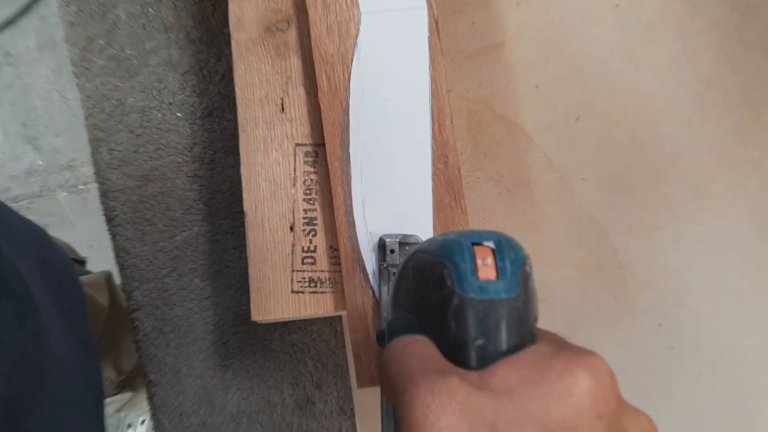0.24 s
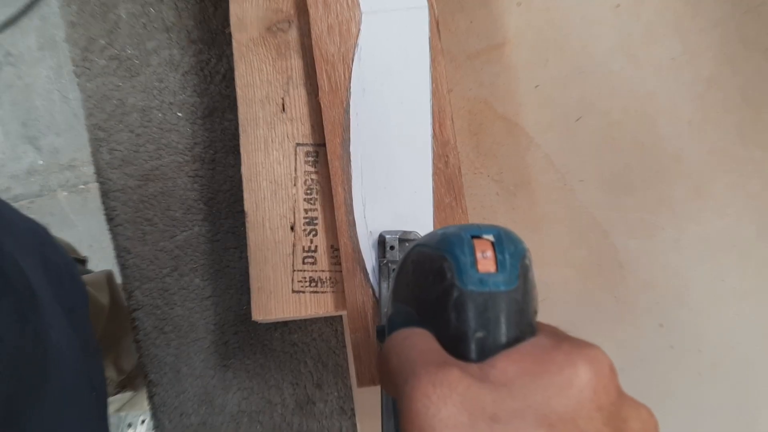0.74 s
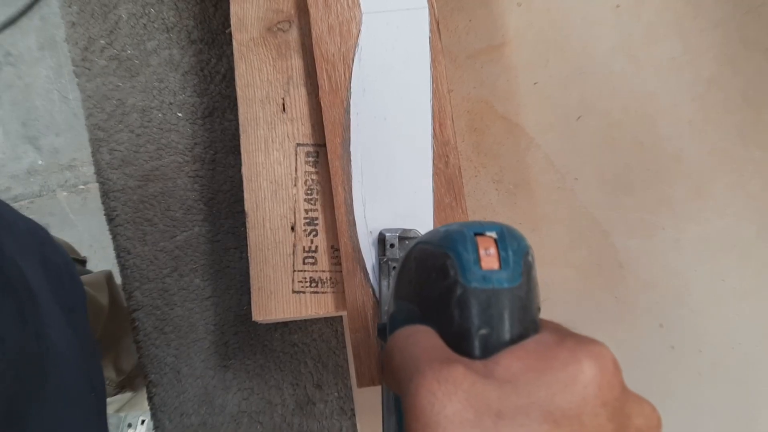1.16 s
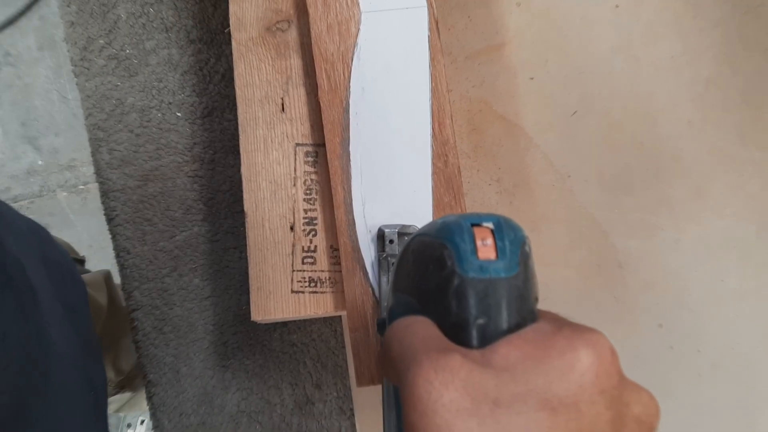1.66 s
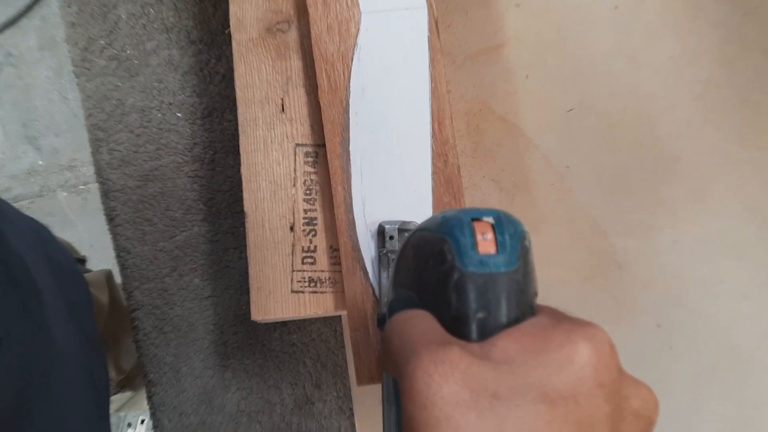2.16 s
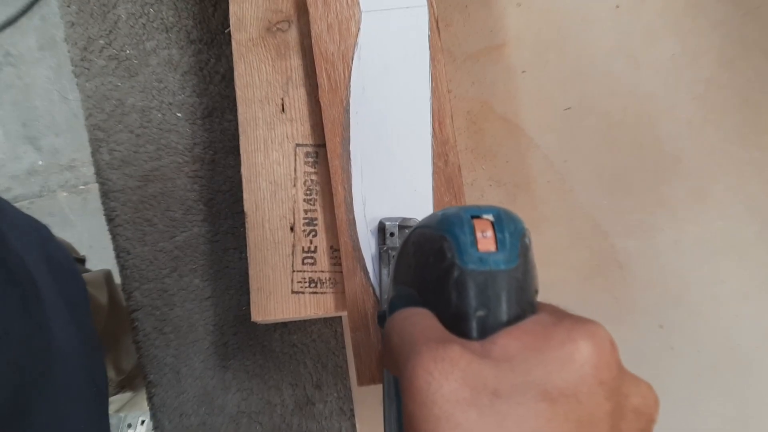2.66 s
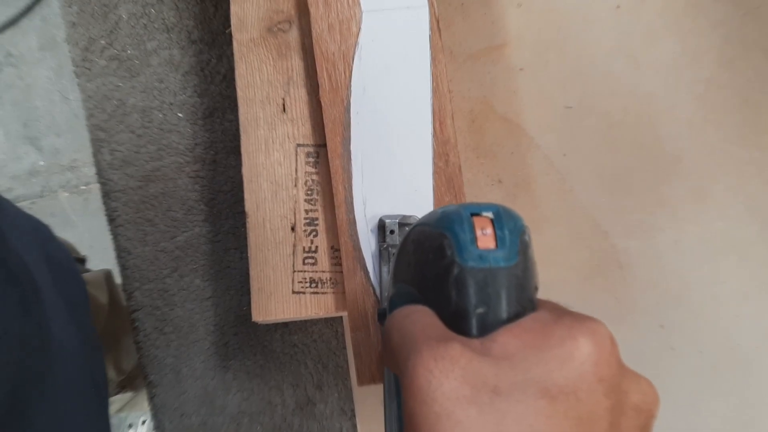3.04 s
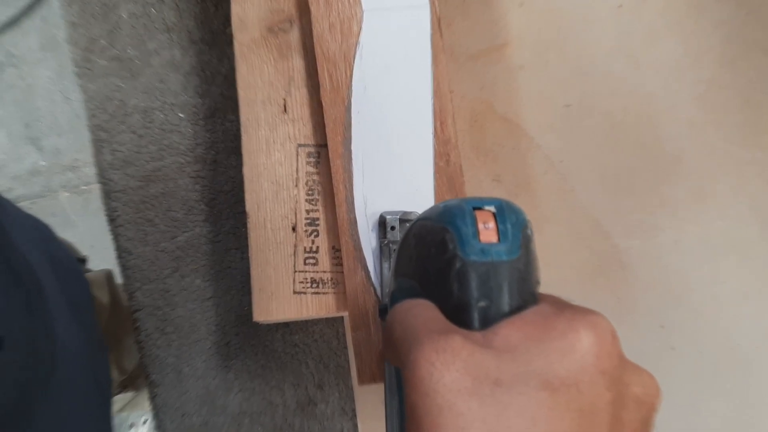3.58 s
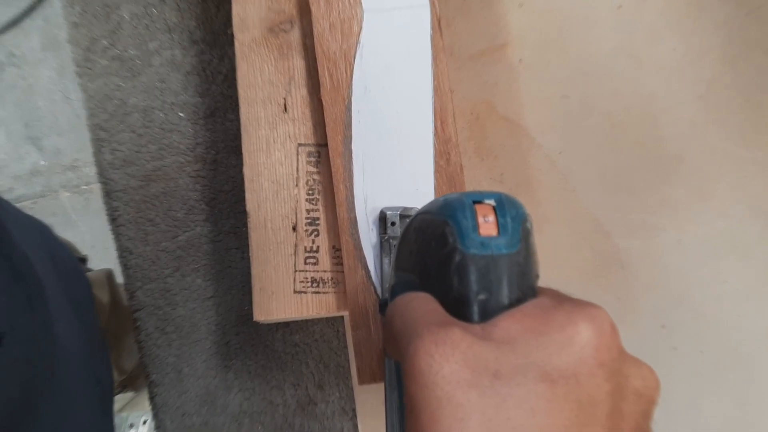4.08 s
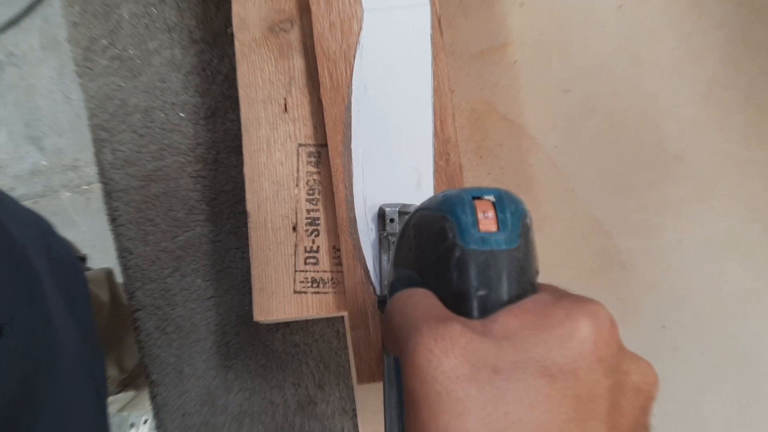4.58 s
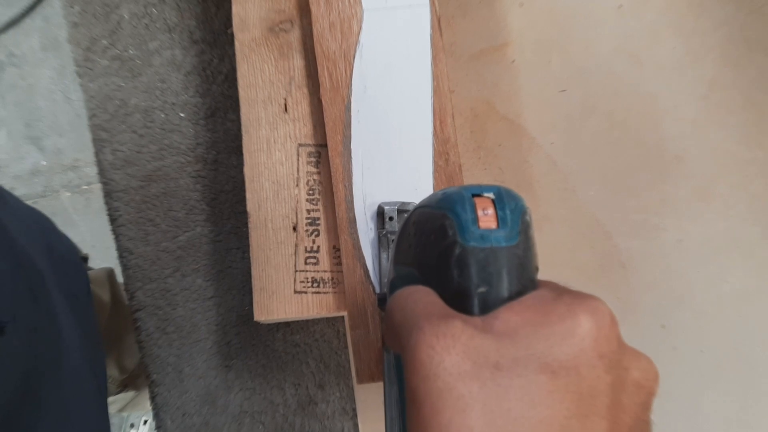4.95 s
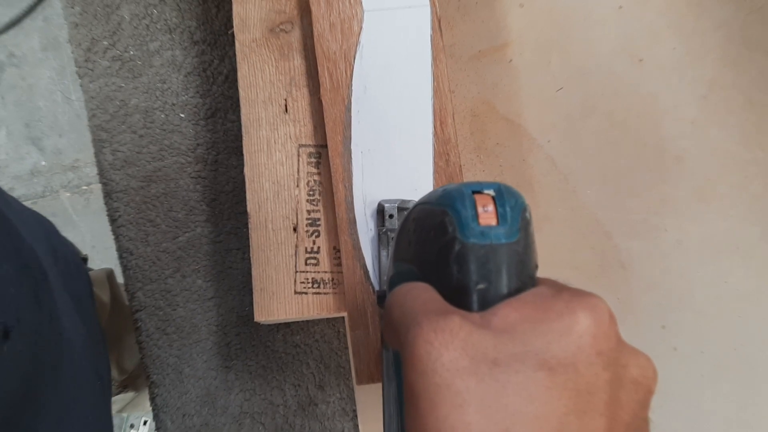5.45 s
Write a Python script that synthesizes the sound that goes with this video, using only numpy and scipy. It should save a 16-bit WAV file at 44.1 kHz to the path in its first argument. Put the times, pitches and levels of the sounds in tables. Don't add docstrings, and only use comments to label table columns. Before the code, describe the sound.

Close, loud power-saw chatter on wood: a rough buzz of about forty-four strokes per second, each with a hard knock and a softer return. Bright casing rattle and tearing fibres dominate over a weak hum. Pitch sags slightly, then recovers near the end, while the tone shifts and a foot-plate ring joins. Dry workshop, stereo microphone near the tool, no ending or stop.

```python
import sys
import numpy as np
from scipy import signal
from scipy.fft import rfft, irfft
from scipy.io import wavfile
from scipy.ndimage import uniform_filter1d, minimum_filter1d, map_coordinates

SR = 44100
rng = np.random.default_rng(int(sys.argv[2]) if len(sys.argv) > 2 else 0)


def to_linear_factor(level_db):
    exponent = np.asarray(level_db, float) / 20
    return 10 ** exponent


def master(y):
    cut = np.clip(np.atleast_2d(y).T, -1, 1)
    pcm = np.round(cut * 32767)
    wavfile.write(sys.argv[1], SR, pcm.astype(np.int16))


N = 251811
TIME = np.arange(N) / SR


def rms_one(x):
    return x / np.sqrt(np.mean(x ** 2) + 1e-20)


def in_time(rows):
    s, *columns = np.transpose(rows)
    return [np.interp(TIME, s, c) for c in columns]


def at_hz(points, hz):
    table_hz, values = np.transpose(points)
    return np.interp(np.log(hz + 1), np.log(table_hz), values)


def drift(rate_hz):
    count = int(N / SR * rate_hz) + 3
    return map_coordinates(rng.standard_normal(count), [TIME * rate_hz], order=2)


def grip_thump():
    lower = np.exp(-(TIME / 0.048) ** 2) * np.sin(2 * np.pi * 92 * TIME + 1.5)
    upper = 0.47 * np.exp(-((TIME - .06) / 0.025) ** 2) * np.sin(2 * np.pi * 145 * TIME)
    return to_linear_factor(-37.5) * (lower + upper)


# [t/s, stroke rate f/Hz]
SPEED = [(0, 44.591), (.4, 44.149), (1.5, 44.136), (2.0, 43.714), (2.6, 43.611), (3.1, 43.471),
         (4.5, 43.538), (5.71, 44.684)]


def crank():
    start_turn = .021
    return start_turn + np.cumsum(in_time(SPEED)[0]) / SR


# [multiple of the stroke rate, level/dB]
HUM = [(2, -22), (3, -19), (4, -13), (5, -6.5), (6, 0), (7, -11.5), (8, -14), (10, -6), (11, -22), (12, -5),
       (13, -14), (14, -11), (15, -17), (17, -10), (19, -8)]
# [t/s, strongest point/turn of the three]
THROB = [(.3, 1.2), (1.3, -.8), (2.4, .5), (3.1, 2.2), (4.5, 2.2), (5.0, 1.3)]


def hum(turns):
    swing = 2 * np.pi * (turns - 1 / 3)
    throb = 1 + .45 * np.exp(-2j * np.pi * (turns - in_time(THROB)[0]) / 3)
    ending = np.clip(TIME - 3.4, 0, 1.5)
    growth_db_per_s = {12: 1.0, 13: 4.0}
    total = 0
    for order, db in HUM:
        level_db = -51 + db + growth_db_per_s.get(order, -3.0) * ending + 0.95 * drift(12.0)
        total = total + to_linear_factor(level_db) * np.exp(1j * order * (swing + 0.025 * drift(9.0)))
    return np.real(throb * total)


# [t/s, guide level/dB, holder and casing level/dB]
BITES = [(0.1787, -0.5, 1), (0.2005, 0.5, 0), (0.2689, 1, 0.5), (0.4046, 1, -1), (0.4725, 1, -0.5),
         (0.5182, -0.5, 0.5), (0.7215, 1, 0), (0.8123, -0.5, 2.0), (0.903, 3.0, -1), (1.0161, 1, 1),
         (1.1068, 2, 2), (1.1497, 1, 1), (1.308, 2, 0.5), (1.3559, 2, 2), (1.4913, 2, -2), (1.5824, 1.5, 2),
         (1.785, 1, 0), (1.8074, -2, 1), (1.876, 2.0, 0), (1.924, 1, 0.5), (2.4279, 2.0, -0.5),
         (2.451, 1, -2), (2.4939, 2, -0.5), (2.562, 1, 0), (2.6544, 3, -2.5), (2.7267, 2.0, -1),
         (3.049, -0.5, -2), (3.21, 0, 1.5), (3.4164, 0.5, -0.5), (3.62, 2, 1.5), (3.7578, 3.5, -1),
         (3.8273, -1.5, 0.5), (3.898, 1, 0.5), (3.9188, 2.5, -2.5), (3.9877, 1.5, 1), (4.056, 1.5, 1.0),
         (4.1256, 0.5, 0), (4.1947, 0.5, 0), (4.2667, 0, 0), (4.379, -0.5, 3), (4.4474, 1.5, 0.5),
         (4.4712, 1.5, 0.5), (4.517, 3, 0.5), (4.585, -1.5, 0.5), (4.6547, 1, 1), (4.7034, 3, 1),
         (4.726, -0.5, 0), (4.7907, 2, 1.5), (4.859, 2.0, 0.5), (4.9073, 2, 0.5), (4.928, 2, -0.5),
         (4.9755, 2.5, 2), (5.0869, 3, 0), (5.155, 2.5, -1.5), (5.2706, 1.5, -2), (5.4068, 0.5, -1.5),
         (5.4519, 1.5, -1), (5.4741, 0, -0.5), (5.5156, 1.5, 1.5)]
# [t/s, guide level/dB, holder and casing level/dB]
SKATES = [(0.155, 1, -5), (0.292, 0, 1), (0.314, 0, -1.5), (0.377, -2.0, -2.0), (0.495, -1.5, 0.5),
          (0.54, -0.5, -1), (0.926, -8, 0.5), (0.948, -1.5, -1), (0.972, -3, 0), (0.993, -1.5, -3),
          (1.129, 0, -3), (1.333, -6, -2.5), (1.401, -4, 1.5), (1.424, -2, -4), (1.628, -1, 2.5),
          (1.673, 0, 1), (1.696, 1, 0), (1.764, 0, -2), (1.901, -3.5, -1), (1.947, 0, -1), (1.992, 0, 0),
          (2.176, -4, 0.0), (2.244, 3.5, -1), (2.313, 0, -2), (2.382, -2.0, -2.5), (2.473, -7, -2),
          (2.541, -3, -1.5), (2.611, -6, -1), (2.886, -5, 0.5), (3.072, -1.5, -0.5), (3.094, -1.5, 1),
          (3.232, -1, 1), (3.275, -2.0, 1.5), (3.486, -1, 0.5), (3.532, -2.0, -0.5), (3.642, -0.5, -2),
          (3.737, -4, 0.5), (3.806, 1, -1.0), (3.875, -0.5, 0), (3.944, -1.0, 0), (4.013, 0, 1),
          (4.033, -1, -0.5), (4.173, 0, 1.5), (4.22, 0.5, -1), (4.358, -2.5, 0), (4.428, -3.0, 1),
          (4.496, -4.0, -2.5), (4.542, -5, -2), (4.681, -2, -1), (4.746, -1, -0.5), (4.816, -4.5, -4),
          (4.882, -3, -2.0), (4.951, -3.5, -2.5), (4.999, 2.5, -1.5), (5.068, 1, -1.5), (5.18, -4.5, -4),
          (5.292, -2, -3), (5.43, -3, -3), (5.497, 1, -1), (5.54, -1.5, -1)]


def stroke_force_db(turns):
    plain_db, force_gain = -1.5, 1.6
    force_db = plain_db + .5 * rng.standard_normal((2, int(turns[-1]) + 3))
    first_stroke = (.062, 2.4, 1.8)
    for s, guide_db, casing_db in [first_stroke] + list(BITES) + list(SKATES):
        stroke = int(turns[int(s * SR)] + .5)
        force_db[:, stroke] = plain_db + force_gain * np.array([guide_db, casing_db])
    return force_db


# [t/s, depth 0-1.5, strongest point/turn of the three]
GEAR_BEAT = [(0, 1, 2.8), (.6, 1, 1.7), (1.0, 1, .8), (1.4, 1, .6), (1.8, .8, 1.3), (2.2, 1.1, 1.9),
             (2.6, 1.2, 2.4), (3.0, .8, 2.6), (3.4, .9, 3.6), (3.8, 1.3, 3.4), (4.2, 1, 3.7), (4.6, 1, 2.9),
             (5.0, .6, 2.5), (5.71, .4, 2.3)]


def gear_beat_db(turns, force_db, swing_db, early=0):
    stroke = np.arange(len(force_db))
    depth, strongest = (np.interp(stroke, turns, c) for c in in_time(GEAR_BEAT))
    return force_db + swing_db * depth * np.cos(2 * np.pi * (stroke - strongest + early) / 3)


def knocks(turns, contacts, force_db, steady_db, spread_db):
    turn_s = 1 / 43.75
    power = to_linear_factor(steady_db) ** 2 * np.ones(N)
    blows = np.zeros(N)
    for turn, ms, db in contacts:
        stroke = np.floor(turns - turn + .25).astype(int) + 1
        late, size = rng.standard_normal((2, len(force_db)))
        turns_since = turns - turn - stroke + 1 - .003 * late[stroke]
        since = turns_since * turn_s / (ms / 1000)
        own = np.clip(stroke - (turn < .5), 0, len(force_db) - 1)
        height = to_linear_factor(db + force_db[own] + spread_db * size[stroke])
        blows[1:] += height[1:] * ((since[1:] >= 0) & (since[:-1] < 0))
        since = np.clip(since, 0, None)
        power += (height * since * np.exp(1 - since)) ** 2
    return np.sqrt(power), blows


def chatter(turns, repeat, count=3):
    patterns = rng.standard_normal((3, 3024))[:, (turns * 1008).astype(int) % (1008 * count)]
    weights = np.array([drift(1.6) for pattern in patterns])
    same = np.sum(weights * patterns, axis=0) / np.sqrt(np.sum(weights ** 2, axis=0) + 1e-9)
    repeat = np.clip(repeat, 0, 1)
    return np.sqrt(repeat) * same + np.sqrt(1 - repeat) * rng.standard_normal(N)


def ringing(drive, modes, along):
    out = np.zeros((2, N))
    for k, (hz, width_hz, start_db, end_db, lead, balance_db) in enumerate(modes):
        r = np.exp(-np.pi * width_hz / SR)
        pole = r * np.exp(2j * np.pi * hz / SR)
        ring = signal.lfilter([(1 - r) ** 2], [1, -2 * pole, pole ** 2], drive) * (-1) ** k
        ring *= to_linear_factor(start_db + (end_db - start_db) * along + .8 * drift(5.0))
        out[0] += ring.real * to_linear_factor(balance_db / 2)
        out[1] += (ring * np.exp(1j * lead)).real * to_linear_factor(-balance_db / 2)
    return out


# [position/turn, length/ms, level/dB]
BOARD_CONTACTS = [
    (.06, 1.4, 1),
    (.62, 1.3, -2),
    (.80, 1.3, -6),
]
# [f/Hz, width/Hz, start level/dB, end level/dB, right's phase lead/rad, L-R level/dB]
BOARD = [(770, 310, -24, -27, -0.51, 5), (1076, 138, -18.5, -12.5, 1.0, 2), (1290, 193, -8.5, -13.5, 1, 1)]


def board_ring(turns, along, force_db):
    beat_db = gear_beat_db(turns, 0.4 * force_db, swing_db=0.5, early=1.33)
    scrape, blows = knocks(turns, BOARD_CONTACTS, beat_db, steady_db=-12.5, spread_db=2.0)
    return ringing(scrape * chatter(turns, .75) + to_linear_factor(12) * blows, BOARD, along)


# [position/turn, length/ms, level/dB]
HOLDER_CONTACTS = [
    (.735, .7, 3),
    (.88, .8, -6),
    (.16, 1.0, -9),
    (.30, 1.0, -8),
    (.44, .9, -5),
]
# [position/turn, length/ms, level/dB]
END_CONTACT = [
    (.73, .7, -2),
]
# [f/Hz, width/Hz, start level/dB, end level/dB, right's phase lead/rad, L-R level/dB]
HOLDER = [(3400, 56, -10, -14, 2.9, -12), (3586, 56, -10, -9.5, 0.5, 8), (3769, 160, -7, -2.5, 0.97, -2.5),
          (4018, 125, -3.5, -5, -0.93, 1)]


def holder_ring(turns, along, force_db, upper_db):
    beat_db = gear_beat_db(turns, .6 * (force_db + upper_db) + .3, swing_db=2.0)
    scrape, blows = knocks(turns, HOLDER_CONTACTS, beat_db, steady_db=-10, spread_db=.7)
    drive = .55 * scrape * chatter(turns, .9) + to_linear_factor(21) * blows
    slap, slap_blows = knocks(turns, END_CONTACT, 1.4 * force_db, steady_db=-40, spread_db=1.0)
    drive += along * (.8 * slap * chatter(turns, .55) + to_linear_factor(20) * slap_blows)
    return ringing(drive, HOLDER, along)


# [position/turn, length/ms, level/dB]
CLAMP_CONTACTS = [
    (.70, 1.0, -9),
    (.88, .9, 4),
    (.2, 1.0, -8),
    (.42, .9, -8),
]
# [f/Hz, width/Hz, start level/dB, end level/dB, right's phase lead/rad, L-R level/dB]
CLAMP = [(1439, 130, -30.5, -8.5, 0.79, -1), (1590, 103, -11.5, -16.5, 0.39, -1),
         (1697, 108, -6, -17.5, 0.21, 0)]


def clamp_ring(turns, along, force_db):
    beat_db = gear_beat_db(turns, -.2 * force_db - 1.2, swing_db=4.0, early=1.3)
    scrape, blows = knocks(turns, CLAMP_CONTACTS, beat_db, steady_db=-12, spread_db=.7)
    return ringing(.62 * scrape * chatter(turns, .9) + to_linear_factor(21.5) * blows, CLAMP, along)


# [position/turn, length/ms, level/dB]
CASING_CONTACTS = [
    (.79, .8, -6),
    (.91, .8, 2),
    (.22, 1.0, -11),
    (.33, 1.0, -4),
    (.46, .9, -9),
]
# [f/Hz, width/Hz, start level/dB, end level/dB, right's phase lead/rad, L-R level/dB]
CASING = [(4450, 390, -4, -30, 1.85, -21), (4830, 520, -3.5, -33, 0, 11.5), (6240, 120, -14, -13, 1.5, 8),
          (8400, 1600, -19, -28.5, -6.5, 2)]


def casing_ring(turns, along, upper_db):
    scrape, blows = knocks(turns, CASING_CONTACTS, upper_db, steady_db=-12, spread_db=.6)
    drive = .65 * scrape * chatter(turns, .85, count=1) + to_linear_factor(19) * blows
    return ringing(drive, CASING, along), scrape, drive


# [position/turn, length/ms, level/dB]
GUIDE_CONTACTS = [
    (.70, 1.0, -4.5),
    (.835, .8, 4),
    (.95, .9, -10),
    (.25, 1.2, -10),
    (.40, .9, -9),
]
# [f/Hz, width/Hz, start level/dB, end level/dB, right's phase lead/rad, L-R level/dB]
GUIDE = [(1938, 152, -15.5, -4.5, -1.3, 1.6), (2057, 150, -6.5, -8, -1.4, 3.4), (2220, 97, -8, -16, -3, 1),
         (2292, 110, -10.5, -10, 0.5, 8.9), (2624, 144, -3, -11.5, 0.28, 3.1),
         (2956, 60, -13.5, -5, 0.6, 5.1)]


def guide_ring(turns, along, force_db):
    beat_db = gear_beat_db(turns, force_db, swing_db=.8)
    scrape, blows = knocks(turns, GUIDE_CONTACTS, beat_db, steady_db=-13, spread_db=.5)
    drive = .52 * scrape * chatter(turns, .9, count=1) + to_linear_factor(21.5) * blows
    return ringing(drive, GUIDE, along), scrape


# [f/Hz, likeness 0-1]
LIKENESS = [(60, 0.65), (300, 0.55), (1000, 0.25), (3000, 0.49), (7000, 0.04), (12000, 0.1)]


def coloured(x, spectrum):
    port_lag_s = 4.5e-5
    size = N + 5000
    hz = np.fft.rfftfreq(size, 1 / SR)
    first, second = rfft(x, size)
    alike = np.clip(at_hz(LIKENESS, hz), 0, 1)
    pair = np.sqrt(1 + alike) * first + np.sqrt(1 - alike) * second * np.array([[1], [-1]])
    pair[0] *= np.exp(-2j * np.pi * hz * port_lag_s)
    return irfft(pair * to_linear_factor(at_hz(spectrum, hz)), size)[:, :N] / 2


# [f/Hz, level/dB per Hz]
RASP = [(30, -62), (100, -61), (250, -33.5), (400, -36), (850, -24), (1150, -18.5), (2000, -7.5),
        (3200, -7.5), (4500, -11), (5600, -15.5), (7500, -24), (10000, -25)]


def tooth_rasp(swell):
    return coloured(.85 * swell ** .55 * rng.standard_normal((2, N)), RASP)


# [position/turn, length/ms, level/dB]
PUFFS = [
    (.84, .9, 0),
    (.96, 1.4, -5),
    (.30, .7, -1),
    (.42, 1.0, -7),
]
# [f/Hz, level/dB per Hz]
HISS = [(3000, -18.5), (7000, 1.5), (9000, -8), (11000, -5), (13500, -11.5), (16000, -5.5)]


def motor_air(turns, force_db, upper_db):
    beat_db = gear_beat_db(turns, .5 * (force_db + upper_db), swing_db=1.2)
    puffs, _ = knocks(turns, PUFFS, beat_db, steady_db=-6, spread_db=1.5)
    return rms_one(coloured(puffs * to_linear_factor(drift(13.0)) * rng.standard_normal((2, N)), HISS))


# [position/turn, length/ms, level/dB]
SHELL_CONTACTS = [
    (.815, .9, 0),
    (.87, .9, -1),
    (.95, .6, -14),
    (.32, .8, -4),
    (.43, .7, -9),
    (.52, .6, -21),
]
# [f/Hz, width/Hz, start level/dB, end level/dB, right's phase lead/rad, L-R level/dB]
SHELL = [(4267, 250, 6, 5, -3, 3.9), (4444, 190, 0.5, -3, 3, 1.2), (4657, 270, 1.5, 1.5, -2.5, 0.5),
         (6443, 100, 2, -27, -2.5, 2.3), (6460, 84, -6, -20, 3, 5.1), (6580, 780, -15.5, -17.5, -8.5, 7.4),
         (6670, 130, -20, -14, 0.3, 2)]


def shell_ring(turns, along, upper_db):
    scrape, blows = knocks(turns, SHELL_CONTACTS, .7 * upper_db, steady_db=-20, spread_db=.8)
    drive = .5 * scrape * chatter(turns, .9, count=1) + to_linear_factor(19) * blows
    return to_linear_factor(2.0) * ringing(drive, SHELL, along)


def cracks(level_db):
    clicks = np.zeros(N)
    for s, guide_db, casing_db in BITES:
        at = int(s * SR)
        clicks[at - 8] = to_linear_factor(level_db[at] + 7 + 1.5 * (guide_db + casing_db))
    band = signal.butter(3, [2400, 5200], "band", fs=SR, output="sos")
    return 4.0 * signal.sosfilt(band, clicks + 1e-18)


# [f/Hz, width/Hz, start level/dB, end level/dB, right's phase lead/rad, L-R level/dB]
FOOT = [(5146, 490, -13, -3, 0.11, .3)]


def foot_ring(casing_drive):
    overhang_s = 4.7
    return ringing(casing_drive, FOOT, np.clip((TIME - overhang_s) / 0.24, 0, 1))


def saw(turns, along):
    turns = turns - .04 * TIME / TIME[-1]
    force_db, upper_db = stroke_force_db(turns)
    casing, casing_scrape, casing_drive = casing_ring(turns, along, upper_db)
    guide, guide_scrape = guide_ring(turns, along, force_db)
    rings = board_ring(turns, along, force_db) + holder_ring(turns, along, force_db, upper_db)
    rings += clamp_ring(turns, along, force_db) + casing + guide
    rings += shell_ring(turns, along, upper_db) + foot_ring(casing_drive)
    rasp = tooth_rasp(guide_scrape + casing_scrape)
    return to_linear_factor(24.5) * rings + to_linear_factor(16.5) * rasp, motor_air(turns, force_db, upper_db)


def workshop(x):
    t60_s = .3
    t = TIME[:SR // 2]
    tail = rng.standard_normal((2, len(t))) * to_linear_factor(-60 * t / t60_s) * (t > .004)
    tail = signal.lfilter([1], [1, -.45], tail)
    return signal.fftconvolve(x, tail / np.sqrt(np.sum(tail ** 2) / 2), axes=1)[:, :N]


# [t/s, feed pressure as level/dB, place along the board 0-1]
CUT = [
    (0.0, -31, 0.4),
    (0.05, -25.5, 0.24),
    (0.17, -19, 0.13),
    (1.05, -19, 0.26),
    (2.4, -17.5, 0.19),
    (3.23, -19, 0.45),
    (4.02, -18.5, 0.72),
    (4.9, -19, 0.94),
    (5.71, -18, 0.81),
]


def scene():
    level_db, along = in_time(CUT)
    turns = crank()
    cutting, air = saw(turns, np.clip(along, 0, 1))
    near = to_linear_factor(level_db) * (cutting + to_linear_factor(-12.5) * air) + cracks(level_db)
    low = hum(turns) * to_linear_factor(0.25 * (level_db + 16.0)) + grip_thump()
    low = low * to_linear_factor(np.array([[.8], [-.8]]))
    return near + low + to_linear_factor(-17) * workshop(near)


def top_cut(x):
    return signal.sosfilt(signal.butter(12, 15720, fs=SR, output="sos"), x)


def record(dry):
    peak = -minimum_filter1d(-np.abs(dry).max(axis=0), size=61)
    x = dry / uniform_filter1d(np.maximum(peak / .9, 1), size=61)
    x = signal.sosfilt(signal.butter(2, 75, "high", fs=SR, output="sos"), x)
    x = signal.sosfilt(signal.cheby2(12, 60, 16200, fs=SR, output="sos"), x)
    return top_cut(x)


dry = scene()
out = record(dry)
master(out)
```